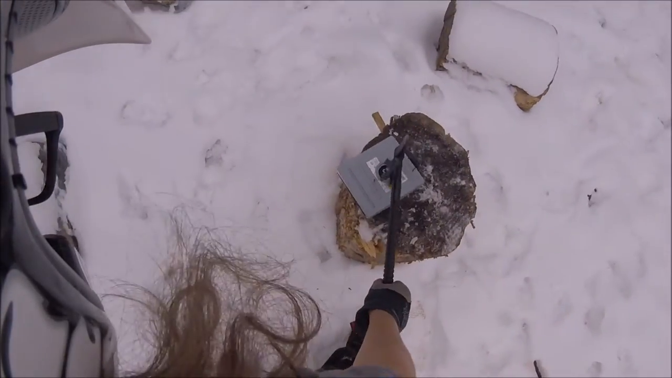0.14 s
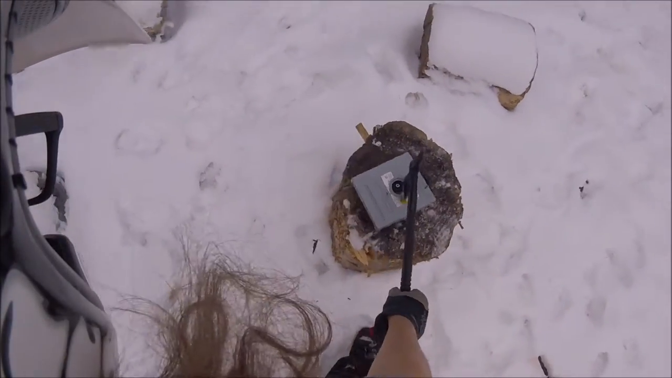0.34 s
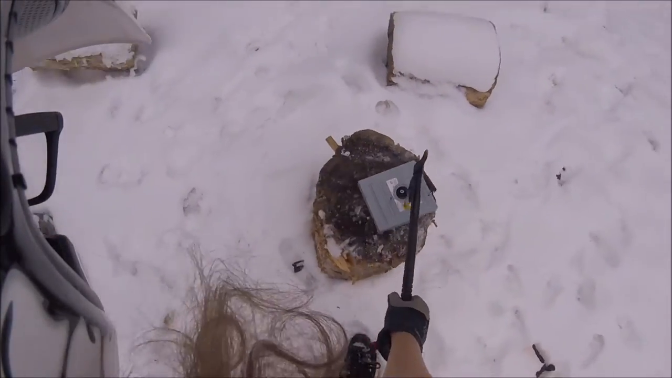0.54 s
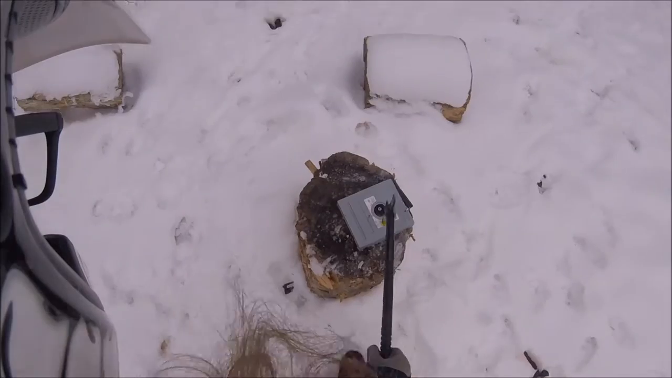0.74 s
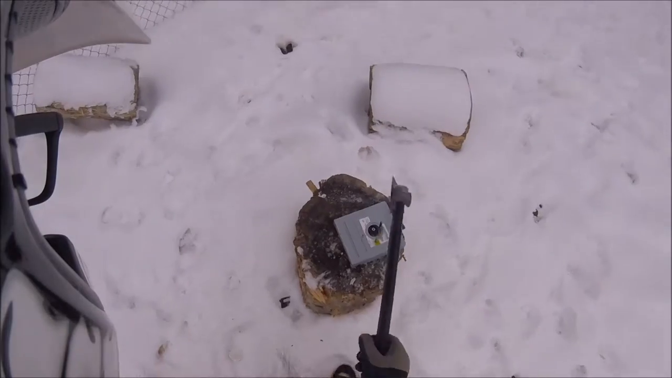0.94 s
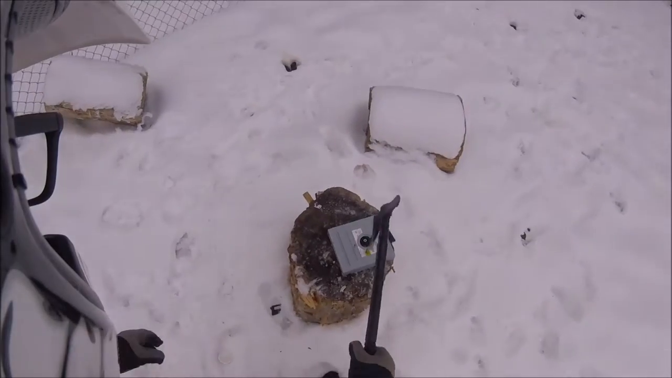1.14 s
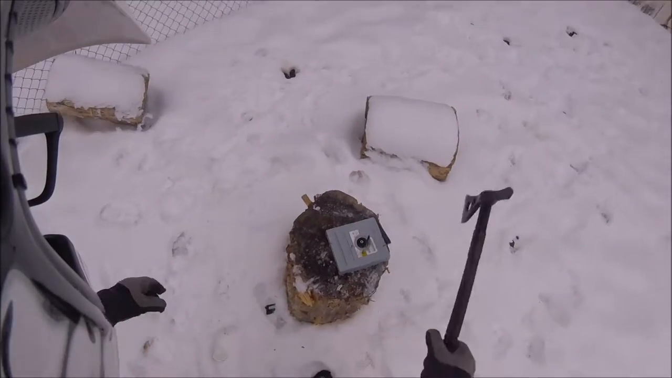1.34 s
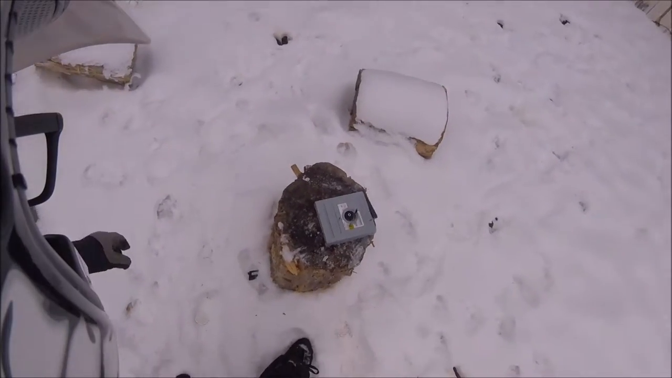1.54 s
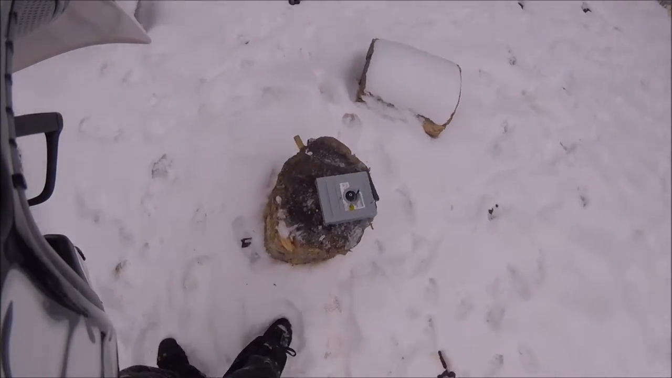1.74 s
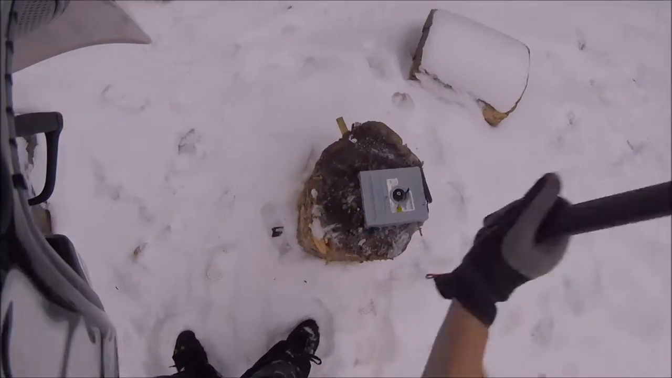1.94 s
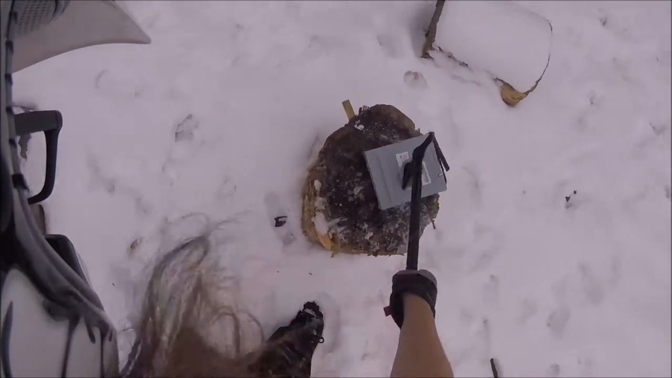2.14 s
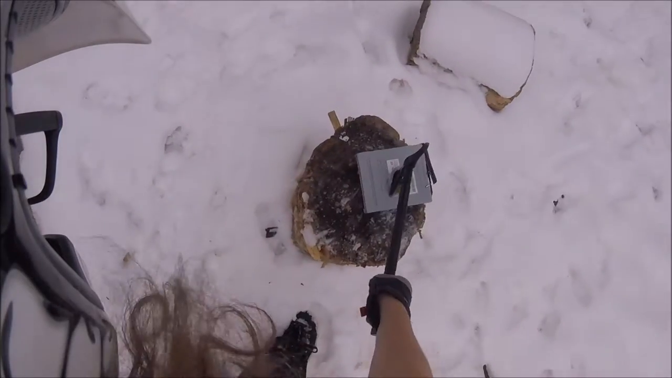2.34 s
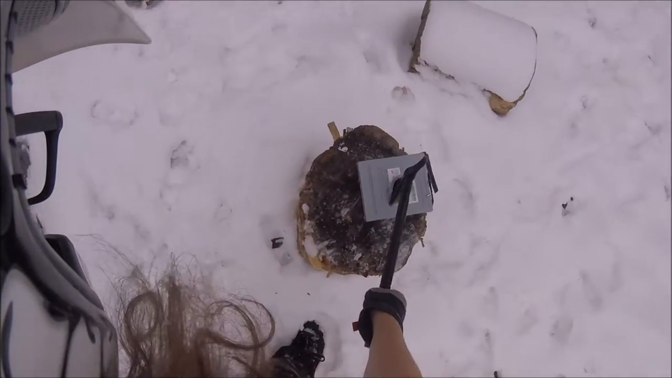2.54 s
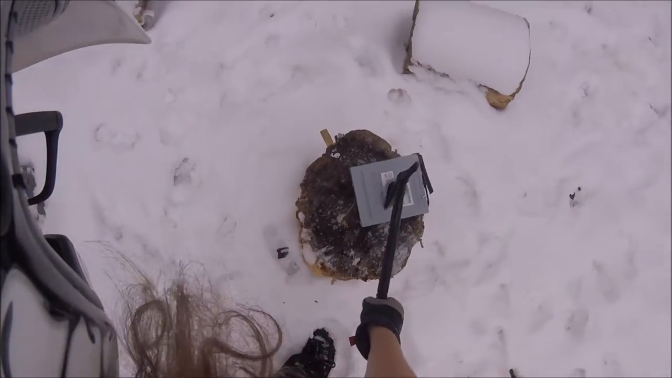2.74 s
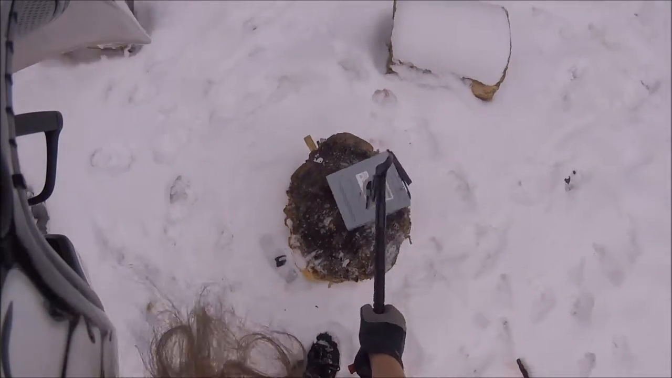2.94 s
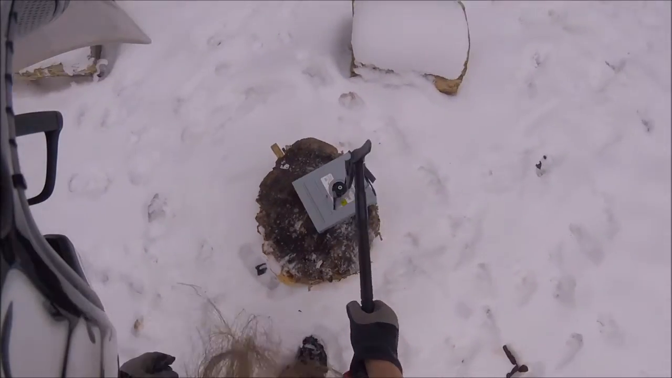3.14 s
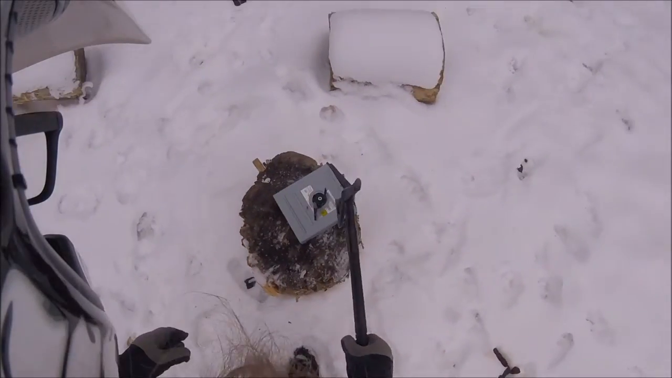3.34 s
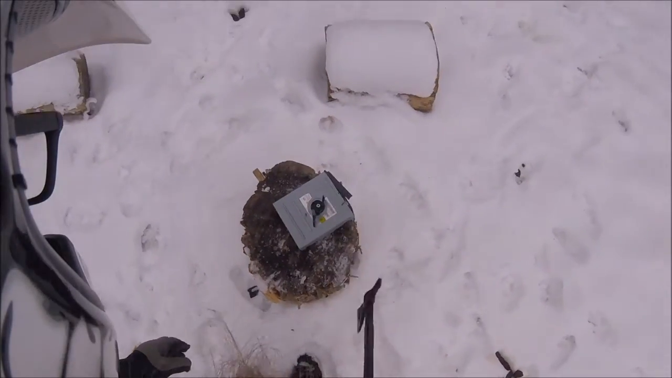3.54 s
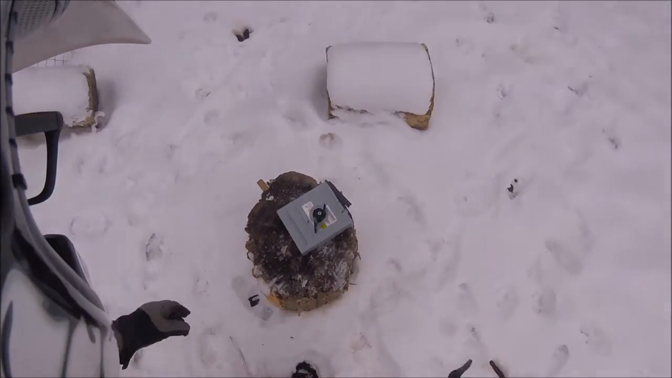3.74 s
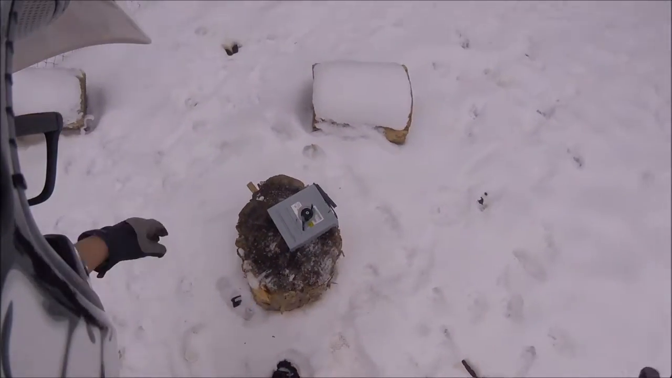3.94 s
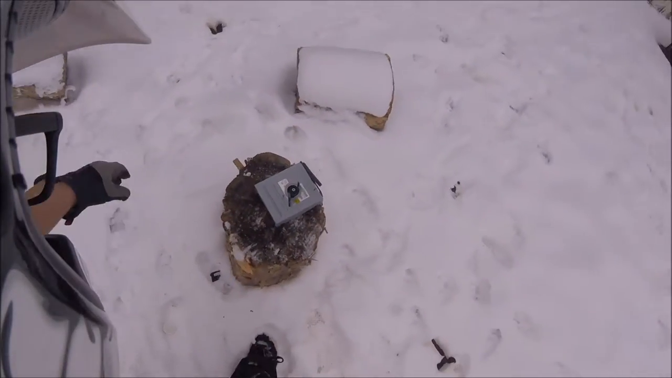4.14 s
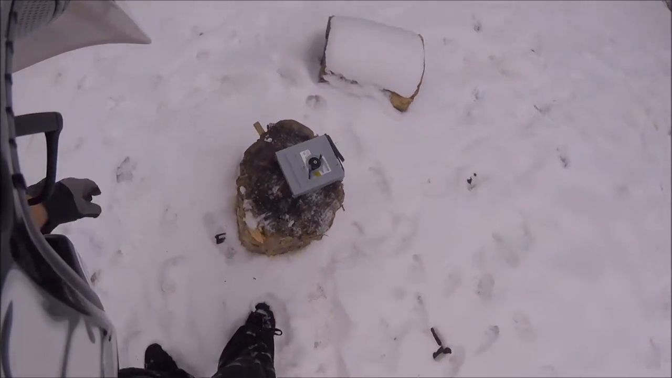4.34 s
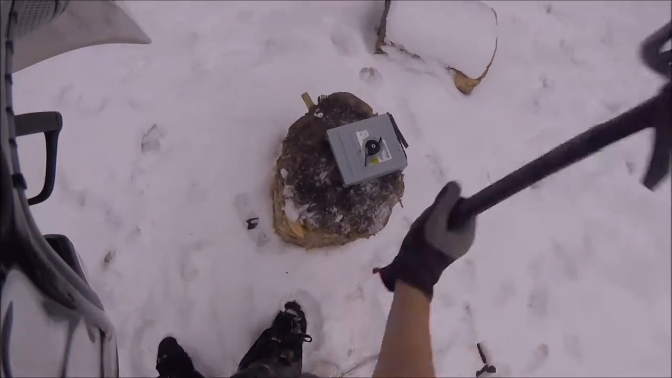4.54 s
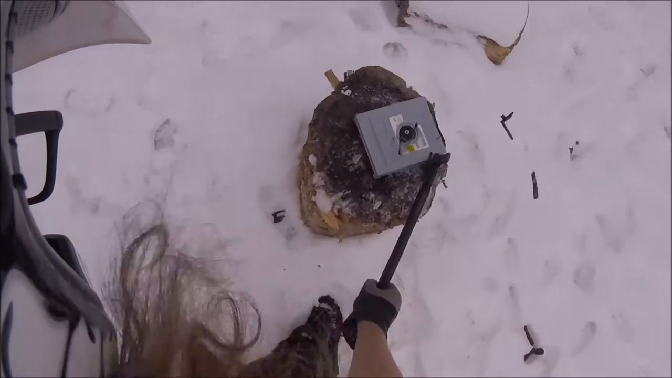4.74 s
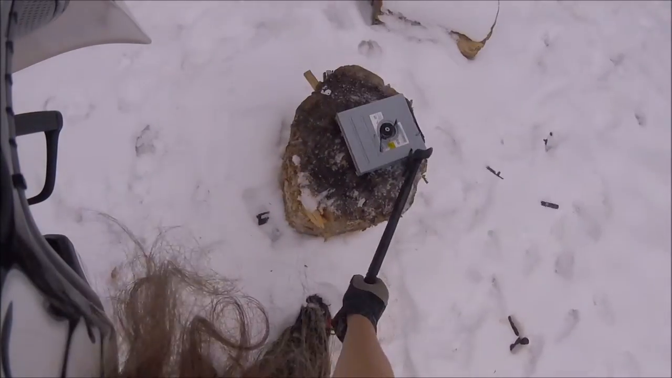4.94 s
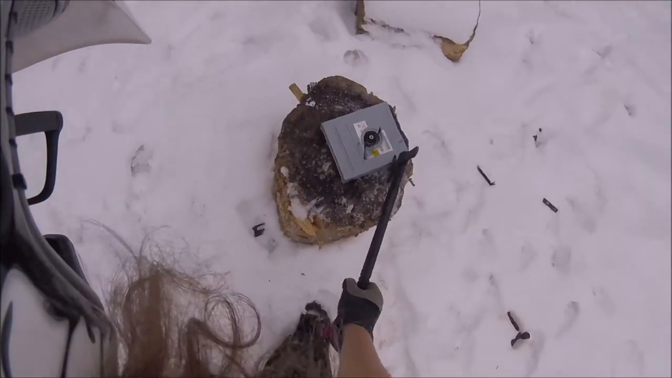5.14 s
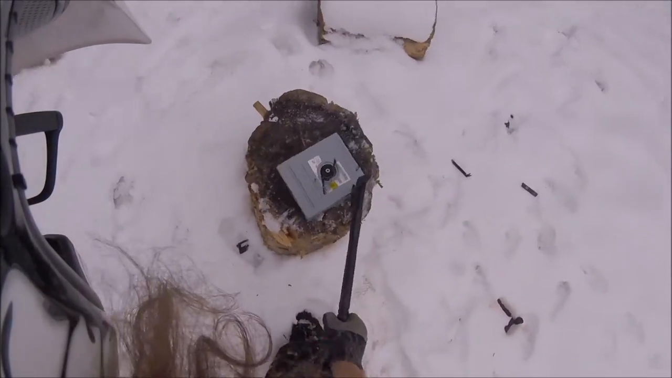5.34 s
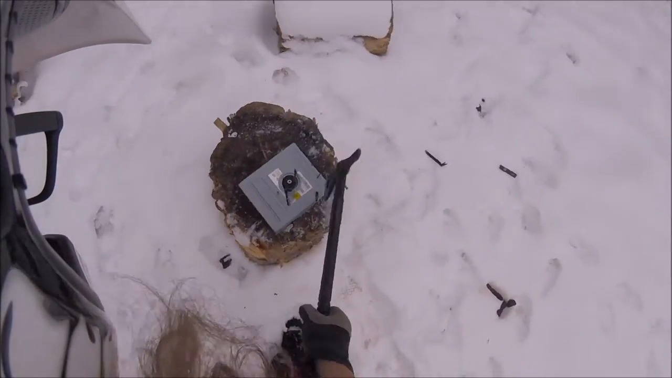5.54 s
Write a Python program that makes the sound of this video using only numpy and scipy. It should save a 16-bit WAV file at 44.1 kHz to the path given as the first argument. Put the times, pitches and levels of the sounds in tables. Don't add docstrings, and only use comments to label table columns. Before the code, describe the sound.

Close, dry head-worn microphone outdoors: faint breeze and soft rumble, small clicks, and a hatchet squeaking loose from thin metal on a stump. Two very loud, short metallic cracks come about two and a half seconds apart, each preceded by a low wind puff and a brief dip, followed by rattling and levering scrapes.

```python
import sys
import numpy as np
from scipy import signal
from scipy.fft import rfft, irfft
from scipy.io import wavfile
from scipy.ndimage import uniform_filter1d

SR = 44100
rng = np.random.default_rng(int(sys.argv[2]) if len(sys.argv) > 2 else 0)


def bounce(signal):
    frames = np.transpose(np.atleast_2d(signal))
    limited = np.clip(frames, -1, 1)
    pcm = np.round(limited * 32767).astype(np.int16)
    wavfile.write(sys.argv[1], SR, pcm)


def nominal_scale(level):
    x = np.asarray(level, float) / 20
    return 10 ** x


N = 250488

# [pitch_hz, level_db per Hz]
AIR_SPECTRUM = [(88, -43.5), (150, -16.5), (196, -3), (289, -2.5), (350, -2), (727, -6), (816, -4),
                (1270, -12), (2350, -15), (4200, -28.5), (4900, -28), (5810, -25.5), (6650, -20.5),
                (10400, -29.5), (13000, -33.5), (14900, -58)]
# [pitch_hz, width_hz, level_db]
MIC_PORT = (6520, 260, 5)
HISS_DB, RUMBLE_DB = -67.5, -58
# [high level_db, middle level_db]
SNOW_CRUNCH_DB = [-21.5, -11]
# [start_s, depth_db]
GAIN_SINKS = [
    (-.4, -16.5),
    (2.15, -15),
    (4.72, -17.5),
]
SINK_S, RECOVER_S = 0.11, 0.89

# [centre_s, half_length_s, rumble_db, flutter_db]
GUSTS = [(.44, 0.062, -63, -81), (0.687, 0.03, -56, -79), (1.0, 0.11, -64, -79), (1.323, 0.026, -79, -82),
         (1.454, .05, -65, -75), (1.648, 0.058, -48, -86), (1.835, 0.07, -46, -86),
         (1.968, 0.029, -35, -33.5), (2.04, 0.023, -34.5, -50), (2.246, 0.068, -66, -52.5),
         (3.092, 0.022, -52, -72), (3.647, .05, -59, -71), (3.718, 0.021, -63, -58.5),
         (3.872, 0.016, -60, -64.5), (4.117, 0.16, -80.5, -64.5), (4.38, 0.057, -57, -77.5),
         (4.516, 0.042, -32, -54), (4.598, 0.013, -32.5, -40), (4.703, 0.067, -57, -52),
         (4.968, 0.029, -59, -82), (5.119, 0.074, -57.5, -70), (5.36, 0.13, -64, -85)]
BREEZE_DB, BREEZE_FLUTTER_DB = -58.5, -58.5

# [start_s, peak_db,
# pitch_hz]
TICKS = [(0.015, -40, 6050), (0.015, -41, 1960), (0.16, -49.5, 5970), (0.266, -43, 5750),
         (.7237, -45, 5420), (2.058, -38.5, 1785), (2.058, -47, 6000), (2.198, -38, 3000),
         (2.3247, -50.5, 5840), (2.6657, -54.5, 6420), (2.8024, -56, 6400), (2.8273, -55.5, 2800),
         (2.8398, -53, 6450), (2.8787, -43.5, 5080), (3.365, -45.5, 5570), (3.5662, -41, 5400),
         (3.6696, -48, 6360), (4.0004, -58, 6800), (4.178, -46, 6230), (4.2437, -39.5, 5670),
         (4.4694, -53.5, 6400), (4.482, -49, 5370), (4.9194, -49, 5170), (5.0173, -47, 6200),
         (5.0527, -51, 5300), (5.0759, -51, 5400), (5.099, -53, 5290), (5.1215, -54, 5240),
         (5.1891, -53.5, 3970), (5.485, -32, 2220), (5.5641, -46.5, 5630), (5.6067, -42, 5700),
         (5.6653, -50, 5770), (5.2074, -53, 2660)]
TICK_WIDTH_HZ = 2200

# [full_pressure_s, held_s, level_db, panels_db over, edges_and_mount_db over]
DRAGS = [
    (0.33, 0.36, -61, -2.5, -0.5),
    (2.121, 0.11, -62, 2.5, -1.5),
    (2.922, 0.15, -53, -2, -6.5),
    (4.7, 0.082, -57, 6, 4.5),
    (5.25, 0.17, -59, -1.5, -8.5),
]
PRESS_DB_PER_S = [164, 165, 220.5, 165, 600]
RELEASE_DB_PER_S = [247, 54.8, 84.7, 93, 80]
# [start_s, peak_db, brightness_db, t60_s]
SLIPS = [(0.274, -40, -11, 0.021), (0.314, -35, -10, 0.033), (0.344, -43, -6, 0.12), (0.363, -37, -12, 0.2),
         (.378, -48, 3, 0.034), (0.394, -51, 3, 0.2), (0.451, -38, -17, 0.15), (0.472, -30.5, -6, 0.043),
         (.528, -40, -12, 0.064), (0.541, -35.5, -14, 0.075), (0.583, -28.5, -6, 0.13),
         (.5895, -35.5, -3, 0.034), (0.5975, -29, 1, 0.022), (0.635, -29, -9.5, 0.086),
         (0.655, -54, 16, 0.034), (2.865, -45, -11, 0.071), (2.887, -42, -20, 0.041),
         (2.899, -46, -12, 0.033), (2.925, -30.5, -10, 0.077), (2.94, -33, 3, 0.088), (2.969, -50, 1, 0.04),
         (2.9883, -24, 0, 0.063), (3.016, -47, 15, 0.029), (3.065, -38.5, 3, 0.059),
         (3.135, -40, 0.5, 0.039), (3.164, -56, 3, 0.06), (5.228, -53, -16, 0.066),
         (5.252, -39.5, -7.5, 0.04), (5.3, -58, -2, 0.04), (5.349, -47, -2, 0.041), (5.361, -44, -3, .03),
         (5.402, -37, -5.5, 0.062), (5.423, -41.5, -16, 0.12), (5.444, -45, -3, 0.082),
         (5.485, -29, -11.5, 0.066)]
# [start_s, peak_db, brightness_db, t60_s]
RATTLES = [(2.113, -41, 7, 0.18), (2.139, -34.5, -16.5, 0.039), (2.197, -31.5, -7.5, 0.054),
           (2.288, -49, 3.5, 0.029), (2.419, -58, 1, 0.06), (4.7183, -35.5, 2, 0.038),
           (4.738, -32, -2, 0.065), (4.754, -31.5, -5, 0.084), (4.787, -35.5, -6, 0.081),
           (4.809, -42.5, -16, 0.077), (4.844, -44, -15, 0.021)]
# [pitch_hz, width_hz, level_db]
CASE_MODES = [
    [(410, 160, -12), (593.5, 120, -2.5), (762, 170, 3), (899, 130, -1), (1090, 120, -8), (1345, 140, -2)],
    [(1905, 465, 5), (2380, 850, 1), (3166, 430, 2), (3805, 670, -4.5)],
    [(4160, 570, -8), (4870, 850, 3.5), (5460, 1100, 7.5), (6240, 700, -0.5), (7500, 1300, -8),
     (9200, 1800, -16)],
]
GRIT_DB = [-3, -3.5, -0.5]
SLIP_RISE_S, SNAP_DB = 0.0014, -5

# [start_s, level_db, pitch_hz]
THUDS = [
    (.597, -34, 630),
    (2.14, -41.5, 719),
    (2.2, -44, 800),
    (2.926, -42, 594),
    (2.99, -35, 531),
    (5.485, -38.5, 590),
]
THUD_T60_S = 0.12
# [start_s, level_db, pitch_hz, t60_s]
PINGS = [
    (.597, -28, 4900, .02),
    (.657, -38, 4850, .02),
    (2.0985, -5.5, 5200, .014),
    (2.1062, -21, 5800, .014),
    (2.1142, -32, 4500, .014),
    (4.6786, -3, 5450, .011),
]
# [level_db, decay_s]
BUCKLES = [
    (-16, 0.002),
    (-14.5, 0.0039),
]

# [centre_s, half_length_s, level_db]
SWISHES = [
    (2.03, .07, -62),
    (4.599, 0.039, -68.5),
]

CONTACTS_S = [
    (2.0976, 2.0984, 2.0996),
    (4.6783, 4.6800, 4.6829, 4.6862),
]
# [level_db, length_s]
PUSHES = [
    [(-3, 0.0004), (5, 0.0005), (-6.5, 0.00044)],
    [(-13, 0.0005), (-27, 0.0002), (-5.5, 0.00049), (-17, 0.00099)],
]
# [pitch_hz, level_db, t60_s]
BODY_MODES = [
    [(540, -6, 0.032), (680.7, -18, 0.03), (735, 1, 0.021), (756, -26.5, 0.13), (990, -8.5, 0.005),
     (1200, -18.5, 0.012)],
    [(63.7, -7.5, 0.018), (157, -19, 0.026), (571, 2.5, 0.013), (842, -1, 0.03), (1230, -9.5, 0.025)],
]
# [pitch_hz, level_db, t60_s]
SHEET_MODES = [
    [(1915, -15.5, 0.032), (2880, -24, 0.011), (3084, -12.5, 0.019), (3590, -20, 0.025), (4552, -21, 0.015),
     (4514, -13, 0.02), (4990, -17, 0.022), (5310, -17.5, 0.039), (6360, -17.5, 0.03), (6050, -15, 0.02),
     (7400, -25, 0.014), (7750, -21.5, 0.017), (8800, -35, 0.043), (9930, -33, 0.024), (11400, -41, 0.0055)],
    [(1800, -19.5, 0.026), (2128, -17, 0.032), (2510, -22, 0.051), (2880, -30, 0.023), (3624, -20, 0.028),
     (3710, -27.5, 0.064), (3960, -20.5, 0.008), (4720, -19.5, 0.046), (5214, -10.5, 0.023),
     (5630, -11.5, 0.028), (6126, -26, 0.05), (6540, -21, 0.036), (7230, -24, 0.031), (8060, -32.5, 0.025),
     (8900, -33.5, .025), (10780, -32.5, 0.0075), (12690, -42, .02)],
]
FOLD_S = [.0016, .0007]
WARP_HZ = 190
# [level_db, decay_s]
TEARS = [
    (-26.5, 0.0013),
    (-22.5, 0.0055),
]

# [start_s, end_s, level_db]
DUCKS = [
    (2.061, 2.0974, -24),
    (4.622, 4.678, -26),
]
TOP_HZ = 13900
# [centre_s, length_s, above_hz, share kept]
THIN_MOMENTS = [(.31, .03, 8000, .3), (.606, .016, 7000, 0), (.61, .025, 2400, .4), (.78, .025, 3000, .5),
                (.958, .03, 2200, .3), (2.124, .022, 7200, 0), (2.27, .025, 5500, .4), (2.4, .03, 3000, .4),
                (2.445, .025, 5000, .4), (3.004, .014, 9000, .2), (3.104, .025, 7000, .3),
                (3.285, .03, 2000, .3), (4.832, .02, 2500, .5), (4.25, .025, 8000, .4),
                (5.255, .03, 7000, .3), (5.322, .025, 7000, .3), (5.512, .03, 3200, .3),
                (5.63, .03, 8500, .3)]


def band(x, hz, width):
    return signal.lfilter(*signal.iirpeak(min(hz, .45 * SR), hz / width, SR), x)


def unit(x):
    return x / np.sqrt(np.mean(x ** 2))


def walk(rate):
    k = int(SR / rate)
    steps = np.repeat(rng.standard_normal(N // k + 1), k)
    return 0.88 * uniform_filter1d(uniform_filter1d(steps, k), k)[:N]


def add(out, s, x):
    i = int(s * SR)
    out[i:i + len(x)] += x[:N - i]


def decay(t, t60):
    return np.exp(-np.log(1000) * t / t60)


def puff(s, half_s):
    return np.exp(-((np.arange(N) / SR - s) / half_s) ** 2)


def grit(size, spread_db):
    level_db = spread_db * np.minimum(rng.exponential(size=size), 4)
    return unit(rng.standard_normal(size) * nominal_scale(level_db))


def background_gain():
    t, gain_db = np.arange(N) / SR, np.zeros(N)
    for s, depth_db in GAIN_SINKS:
        since = np.maximum(t - s, 0)
        gain_db += depth_db * (1 - np.exp(-since / SINK_S)) * np.exp(-since / RECOVER_S)
    return nominal_scale(gain_db)


def blade_pressure():
    t, out = np.arange(N) / SR, np.zeros((3, N))
    for (s, held, db, *above_db), press, release in zip(DRAGS, PRESS_DB_PER_S, RELEASE_DB_PER_S):
        after_blow = min(abs(s - contacts[0]) for contacts in CONTACTS_S) < .06
        if after_blow:
            rise_db = np.where(t < s, -200., 0.)
        else:
            rise_db = press * np.minimum(t - s, 0)
        shape_db = db + rise_db - release * np.maximum(t - s - held, 0)
        out += nominal_scale(shape_db + np.array([0, *above_db])[:, None])
    return out


def open_air(gain, force):
    hz = np.fft.rfftfreq(N, 1 / SR)
    points, db = np.transpose(AIR_SPECTRUM)
    spectrum = rfft(rng.standard_normal(N)) * nominal_scale(np.interp(np.log(hz + 1), np.log(points), db))
    edges = [0, 400, 900, 2000, 4000, 9000, SR]
    parts = []
    for lo, hi in zip(edges, edges[1:]):
        parts.append(nominal_scale(2.2 * walk(14)) * irfft(spectrum * (hz >= lo) * (hz < hi), N))
    high = unit(sum(parts[4:]))
    port_hz, port_width, port_db = MIC_PORT
    high = high + nominal_scale(port_db) * band(high, port_hz, port_width)
    high_crunch_db, middle_crunch_db = SNOW_CRUNCH_DB
    crunch = nominal_scale(high_crunch_db) * high + nominal_scale(middle_crunch_db) * unit(sum(parts[1:4]))
    background = nominal_scale(HISS_DB) * high + nominal_scale(RUMBLE_DB) * unit(sum(parts[:4]))
    return gain * background + force * crunch


def wind(gain):
    puffs = sum(nominal_scale(np.array(db))[:, None] * puff(s, half_s) for s, half_s, *db in GUSTS)
    slow, fast = puffs + gain * nominal_scale(np.array([[BREEZE_DB], [BREEZE_FLUTTER_DB]]))
    rumble = band(band(band(rng.standard_normal(N), 22, 40), 22, 82), 45, 150)
    flutter = band(band(band(rng.standard_normal(N), 87, 53), 89, 100), 110, 210)
    return nominal_scale(0.34 * walk(25)) * (slow * unit(rumble) + fast * nominal_scale(2.4 * walk(29)) * unit(flutter))


def ticks():
    out, t = np.zeros(N), np.arange(1500) / SR
    for s, db, hz in TICKS:
        click = rng.standard_normal(len(t)) * np.exp(-t / 0.0031)
        click = band(band(click, hz, TICK_WIDTH_HZ), hz, 1.2 * TICK_WIDTH_HZ)
        add(out, s, nominal_scale(db + 2.5) * click)
    return out


def case_ring(force, modes, shift_db=0., rough_level=0.):
    out = 0
    for hz, width, db in modes:
        rough = rough_level * grit(N, 2.9) if shift_db else 0
        ring = band(band(force + rough, hz, 2 * width), hz, width)
        out = out + nominal_scale(db + shift_db * walk(30)) * ring
    return out


def scraping(force):
    snaps, t = np.zeros((3, N)), np.arange(6000) / SR
    levels = force * nominal_scale(1 + 3.5 * walk(200))
    for s, db, bright_db, t60 in SLIPS + RATTLES:
        slip = (1 - np.exp(-t / SLIP_RISE_S)) * decay(t, max(t60, .005))
        part_db = db + np.array([0, 0.65 * bright_db - 3.0, bright_db])
        for level, gain in zip(levels, nominal_scale(part_db - 7.0)):
            add(level, s, slip * gain)
        snaps[:, int(s * SR)] = nominal_scale(part_db + SNAP_DB - np.array([0, 1.5, 4]))
    snaps = uniform_filter1d(snaps, size=3) * nominal_scale(-2.5)
    levels = levels * nominal_scale(np.array(GRIT_DB))[:, None]
    click, out = signal.unit_impulse(N), 0
    for level, snap, modes in zip(levels, snaps, CASE_MODES):
        answer = case_ring(click, modes)
        out = out + case_ring(snap / np.abs(answer).max(), modes, 3.5, level / np.linalg.norm(answer))
    return out


def thuds_and_buckling():
    out, t = np.zeros(N), np.arange(6000) / SR
    for s, db, hz, t60 in [(*row, THUD_T60_S) for row in THUDS] + PINGS:
        knock = np.sin(2 * np.pi * hz * t) * (1 - np.exp(-t / 0.0011)) * decay(t, t60)
        add(out, s, nominal_scale(db) * knock)
    for times, (db, decay_s) in zip(CONTACTS_S, BUCKLES):
        crunch = unit(band(band(grit(len(t), 2), 3600, 5000), 3600, 5000))
        add(out, times[0], nominal_scale(db) * crunch * (1 - np.exp(-t / 0.0013)) * np.exp(-t / decay_s))
    return out


def swish():
    rush = unit(band(rng.standard_normal(N), 4000, 5000))
    return sum(nominal_scale(db) * puff(s, half_s) for s, half_s, db in SWISHES) * rush


def edge_tear(t, db, decay_s):
    noise = band(band(rng.standard_normal(len(t)), 8000, 4900), 5700, 5400)
    return nominal_scale(db) * noise * (1 - np.exp(-t / 0.0025)) * np.exp(-t / decay_s)


def body_ring(t, modes):
    ring = sum(nominal_scale(db) * np.cos(2 * np.pi * hz * t) * decay(t, t60) for hz, db, t60 in modes)
    return signal.lfilter(*signal.butter(2, 0.6 * modes[0][0], "high", fs=SR), ring)


def sheet_mode(t, hz, db, t60, fold_s):
    waver = unit(uniform_filter1d(rng.standard_normal(len(t)), size=40))
    phase = 2 * np.pi * (rng.random() + np.cumsum(hz + WARP_HZ * waver) / SR)
    swell = 1 - np.exp(-(t / fold_s) ** 2)
    return nominal_scale(db + 1.5) * swell * decay(t, t60) * np.sin(phase)


def chops():
    out, t = np.zeros(N), np.arange(8192) / SR
    blows = zip(CONTACTS_S, PUSHES, BODY_MODES, SHEET_MODES, FOLD_S, TEARS)
    for times, pushes, body, sheet, fold_s, tear in blows:
        add(out, times[0], edge_tear(t, *tear))
        ring = body_ring(t, body)
        for s, (push_db, push_s) in zip(times, pushes):
            push = -np.sin(np.pi * np.minimum(t / push_s, 1)) ** 2 / (push_s * SR / 2)
            add(out, s, nominal_scale(push_db - 8.0) * signal.fftconvolve(push, ring))
        for hz, db, t60 in sheet:
            add(out, times[0], sheet_mode(t, hz, db, t60, fold_s))
    return out


def scene():
    force, gain = blade_pressure(), background_gain()
    background = open_air(gain, force[0]) + wind(gain) + ticks()
    return (background + scraping(force) + thuds_and_buckling() + swish() + chops())[None]


def band_limit(x):
    return signal.sosfilt(signal.butter(12, 15070, fs=SR, output="sos"), x)


def record(dry):
    gain_db = np.zeros(N)
    for start, end, db in DUCKS:
        gain_db[int(start * SR):int(end * SR)] = db
    gain = uniform_filter1d(nominal_scale(gain_db), 40)
    keep = np.exp(-1 / (0.013 * SR))
    bass_gain = np.maximum(gain, 1 + signal.lfilter([1 - keep], [1, -keep], gain - 1))
    bass = signal.sosfiltfilt(signal.butter(2, 160, fs=SR, output="sos"), dry)
    x = bass * bass_gain + (dry - bass) * gain
    x = x / (1 + (x / .93) ** 6) ** (1 / 6)
    x = signal.sosfilt(signal.butter(8, TOP_HZ, fs=SR, output="sos"), x)
    for s, length, above_hz, kept in THIN_MOMENTS:
        i, size = int((s - .6 * length) * SR), int(1.2 * length * SR)
        hz = np.fft.rfftfreq(size, 1 / SR)
        kept_draw = rng.random(200)[(hz // 170).astype(int)]
        lost = (hz > above_hz) & (kept_draw > kept)
        piece = x[0, i:i + size] * signal.windows.tukey(size, .35)
        add(x[0], (i + .5) / SR, -irfft(rfft(piece) * lost, size))
    return band_limit(x)


dry = scene()
out = record(dry)
bounce(out)
```